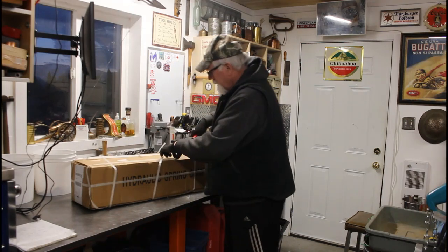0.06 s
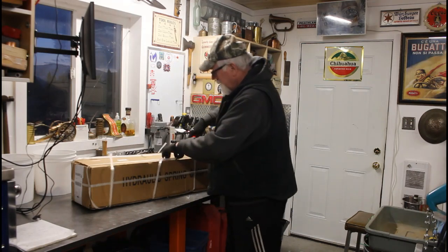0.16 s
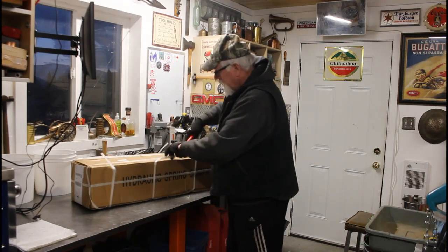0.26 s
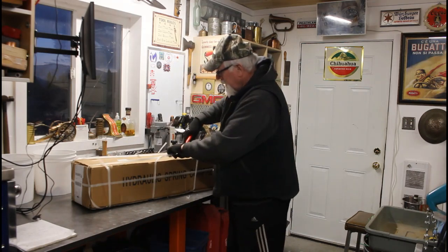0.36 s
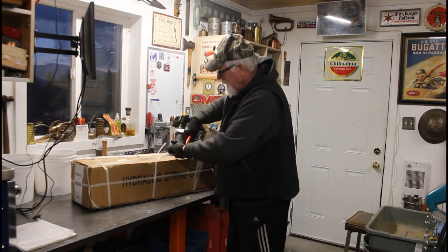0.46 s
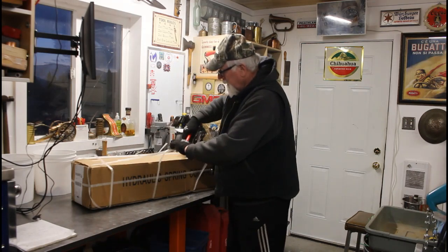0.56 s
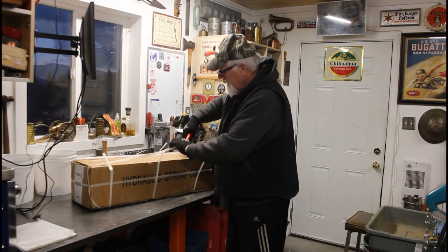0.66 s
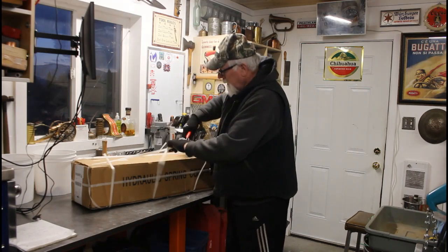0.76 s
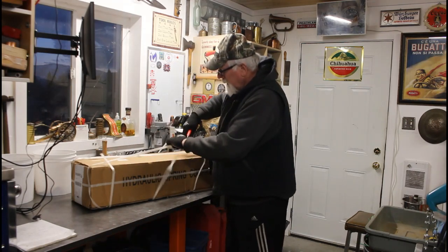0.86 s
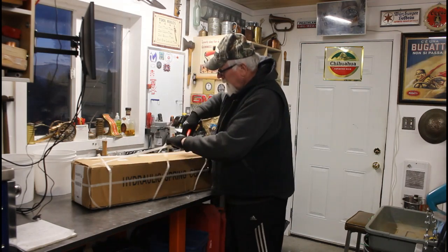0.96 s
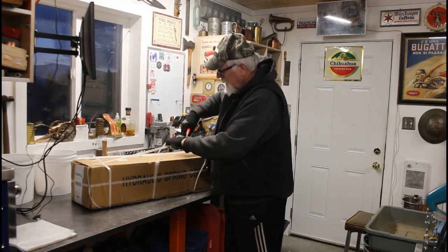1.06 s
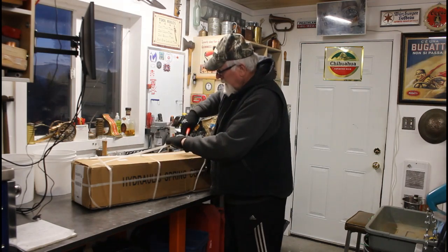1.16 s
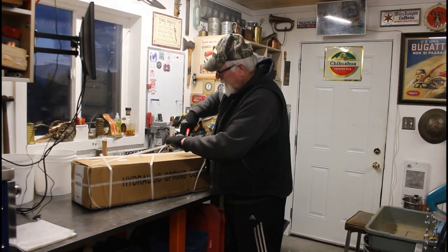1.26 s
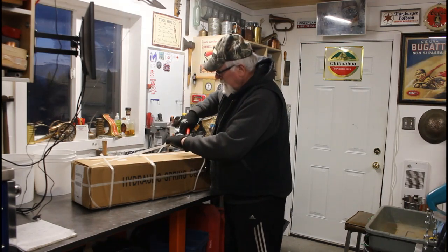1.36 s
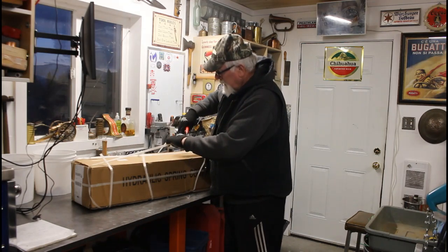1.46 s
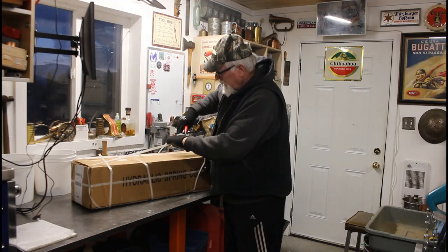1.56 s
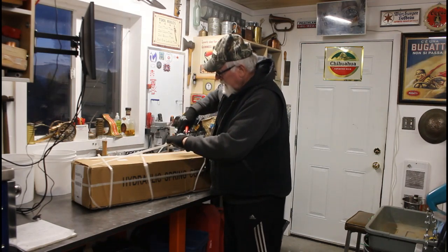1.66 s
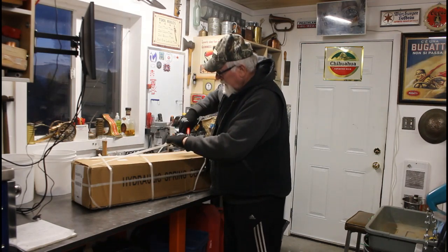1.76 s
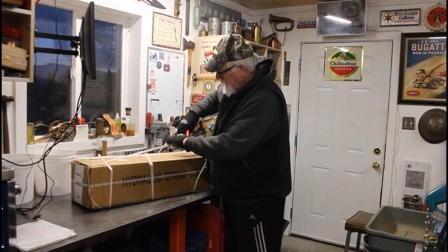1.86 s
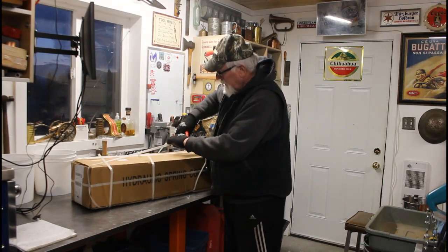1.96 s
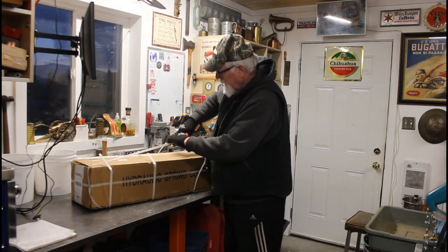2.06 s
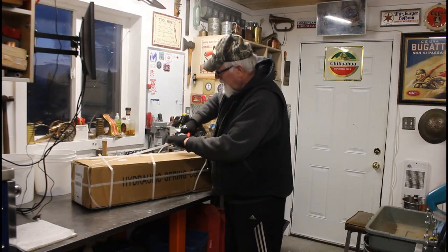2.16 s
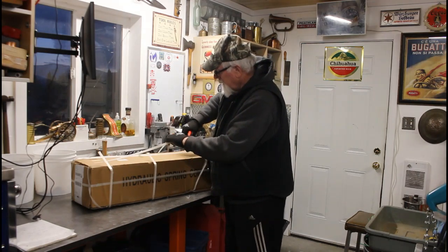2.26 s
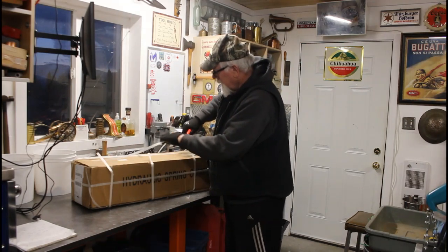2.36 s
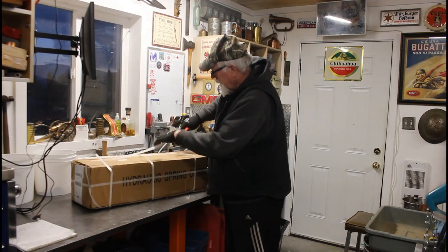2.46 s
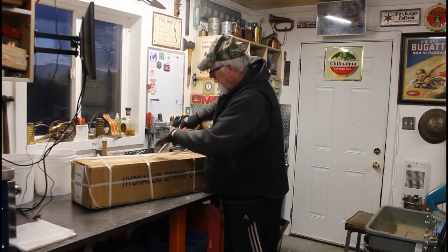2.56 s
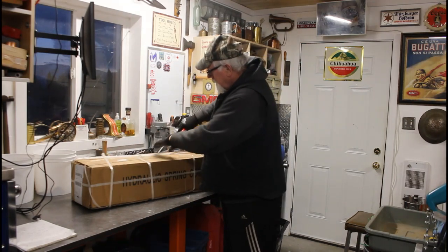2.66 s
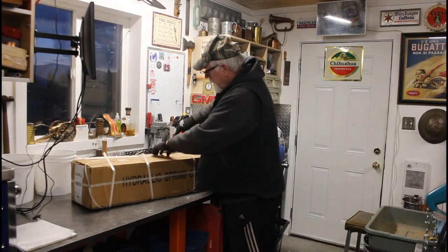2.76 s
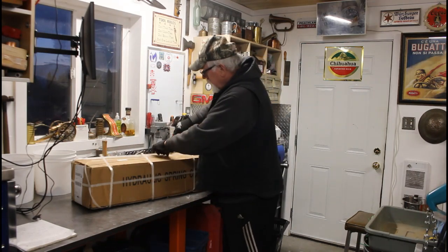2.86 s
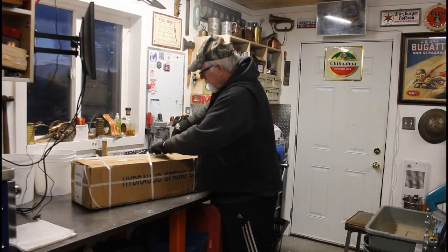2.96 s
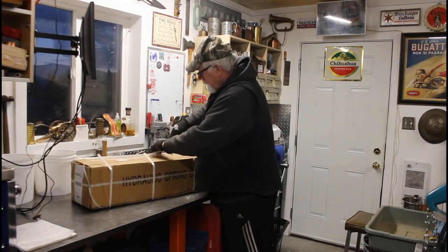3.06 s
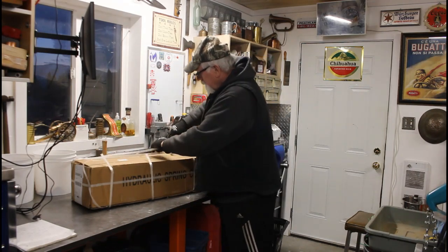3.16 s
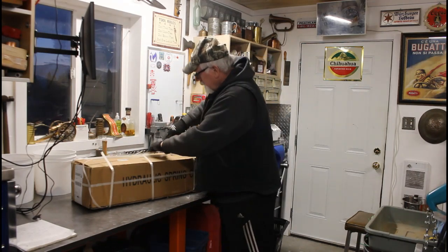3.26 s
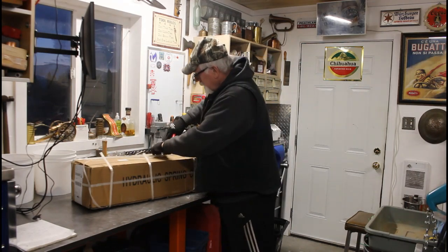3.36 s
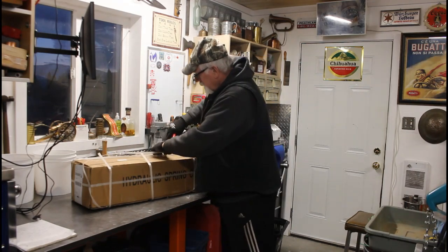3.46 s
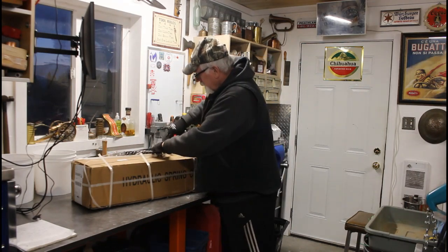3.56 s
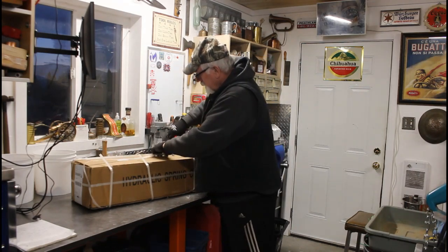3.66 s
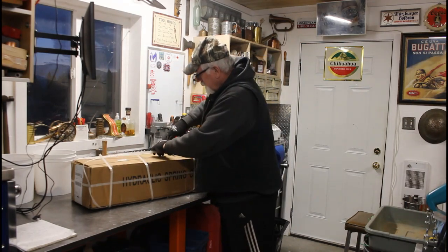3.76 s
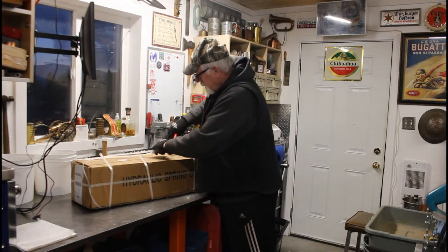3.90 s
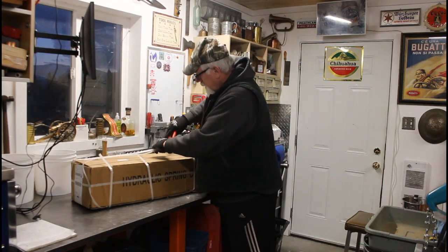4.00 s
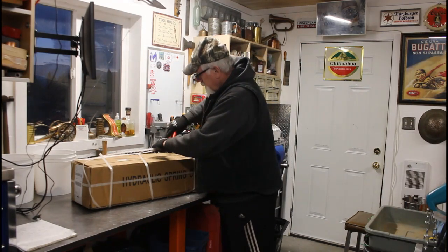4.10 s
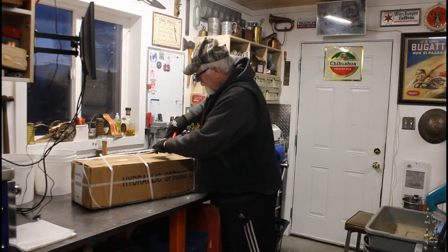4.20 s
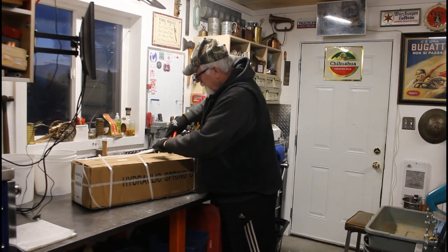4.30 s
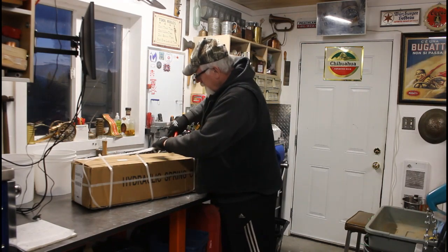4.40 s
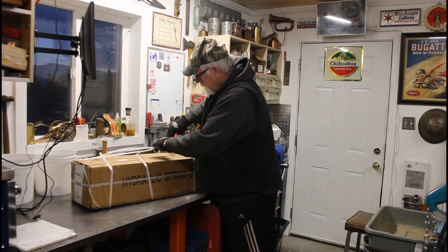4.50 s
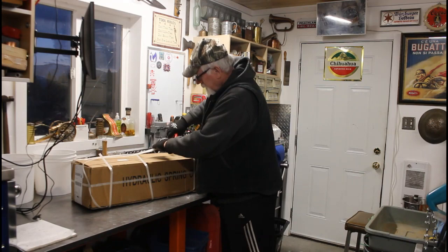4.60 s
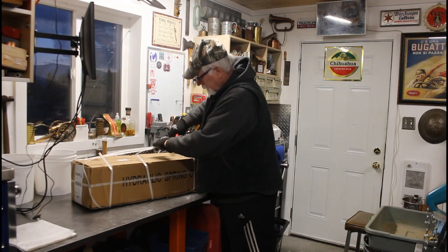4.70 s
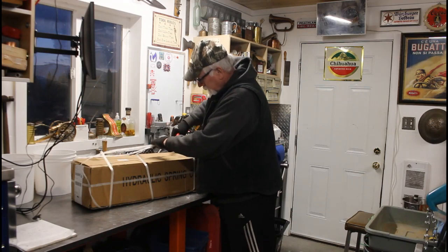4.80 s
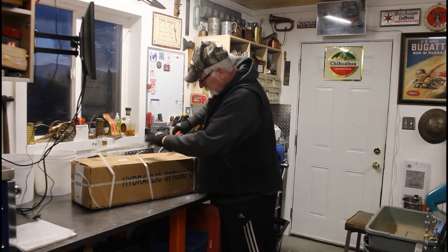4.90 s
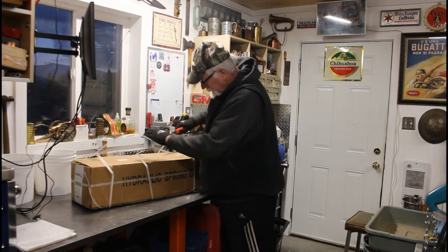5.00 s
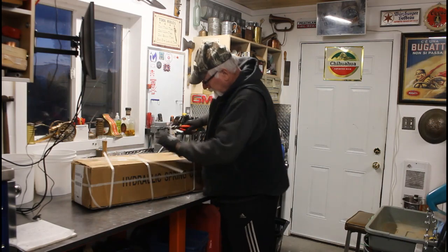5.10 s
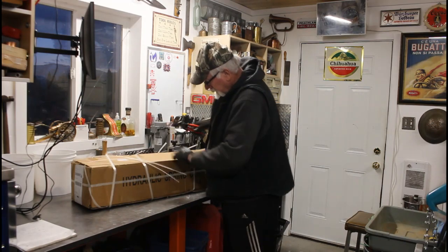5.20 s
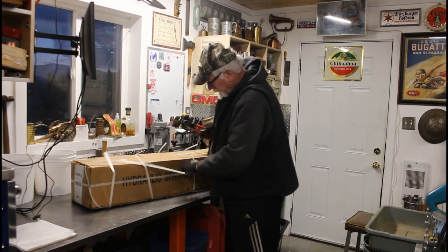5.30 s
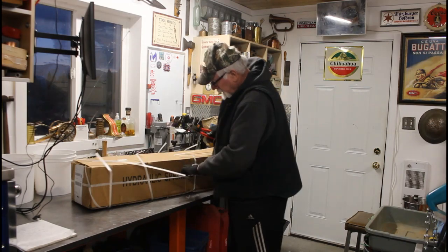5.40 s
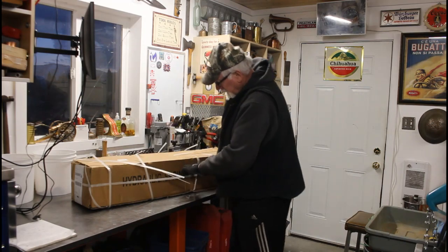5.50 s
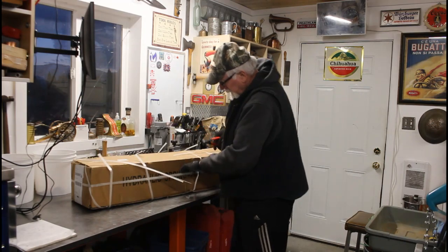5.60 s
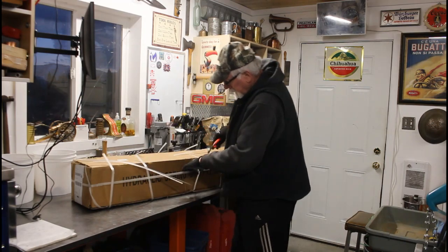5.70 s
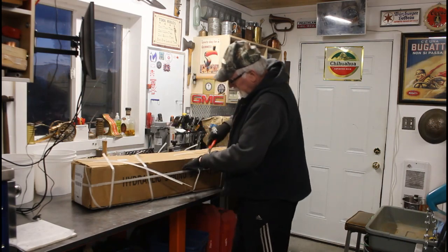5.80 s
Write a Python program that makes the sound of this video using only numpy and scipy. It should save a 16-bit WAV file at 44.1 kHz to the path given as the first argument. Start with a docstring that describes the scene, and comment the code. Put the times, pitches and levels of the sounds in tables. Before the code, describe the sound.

Scuffs, knocks and soft thuds on a hollow cardboard box, a tiny squeak, then two bright strap snaps, each followed by a slap on card.

```python
"""A carton is scraped, bumped and scuffed close by in a small, hard workshop; hand snips squeak once on a strap.
Then two taut plastic straps part in loud bursts of cracks, and their loose ends slap the card.
Cracks and slaps are decaying noise coloured by strap, snips or card; knocks and thuds ring the box panels.
Scrapes, swishes and creaks are tiny random slips; whines are narrow noise and the squeak is a gliding tone.
The room answers with dense reflections over quiet air and a faint low hum."""
import sys
import numpy as np
from scipy import signal
from scipy.fft import rfft, irfft, next_fast_len
from scipy.io import wavfile
from scipy.ndimage import uniform_filter1d

SR = 44100
rng = np.random.default_rng(int(sys.argv[2]) if len(sys.argv) > 2 else 0)


def unload_audio(sound):
    """Save the sound as a 16-bit wav file, at the path given as the first command line argument."""
    columns = np.transpose(np.atleast_2d(sound))
    # keep every value between -1 and 1, then stretch to whole-number steps
    steps = np.round(np.clip(columns, -1, 1) * 32767)
    wavfile.write(sys.argv[1], SR, steps.astype(np.int16))


N = 257716  # samples

# ringing of strap and snips: centre_hz, width_hz, level_db (relative)
SNIP_MODES = [(432, 13, 9.5), (1013, 320, 3), (2554, 330, 5), (3770, 170, 1.5), (4500, 430, 0),
              (4880, 330, 2), (6160, 600, -2.5), (7740, 260, -1), (8750, 300, -3), (13500, 390, -1)]
# carton panel resonances: centre_hz, width_hz, level_db (relative)
PANEL_MODES = [(90, 23, 4.5), (143.5, 28, 2.5), (214, 32, -5.5), (283, 39, -0.5), (363, 150, -8.5),
               (459, 62, -3), (557, 31, -5), (650, 53, -7.5), (1100, 150, -4)]


def amp(db):
    """Amplitude ratio of a level in dB."""
    return 10 ** (np.asarray(db) / 20)


def unit(x):
    """x scaled to rms 1."""
    return x / np.sqrt(np.mean(x ** 2) + 1e-20)


def along(points, hz):
    """Values between (hz, value) points, joined by straight lines on a log frequency axis."""
    f, v = np.transpose(points)
    return np.interp(np.log(hz + 1), np.log(f + 1), v)


def filtered(x, response):
    """x times a response of frequency, without phase shift."""
    size = next_fast_len(len(x) + 8192)
    spectrum = rfft(x, size) * response(np.fft.rfftfreq(size, 1 / SR))
    return irfft(spectrum, size)[:len(x)]


def causal(x, response):
    """x through a minimum-phase filter of the given gain, which rings only after each blow."""
    size = 2 * next_fast_len(len(x) // 2 + 4096)
    gain = np.maximum(response(np.fft.rfftfreq(size, 1 / SR)), 1e-6)
    cepstrum = irfft(np.log(gain), size)
    # folding the cepstrum onto positive time makes the filter causal
    cepstrum[1:size // 2] *= 2
    cepstrum[size // 2 + 1:] = 0
    return irfft(rfft(x, size) * np.exp(rfft(cepstrum)), size)[:len(x)]


def humps(modes, hz):
    """Gain of resonances that stand on a broad base."""
    power = 0.25
    for centre_hz, width_hz, level_db in modes:
        power = power + amp(level_db) ** 2 / (1 + (2 * (hz - centre_hz) / width_hz) ** 2)
    return np.sqrt(power)


def noise(response, size=N):
    """Coloured noise of rms 1."""
    return unit(filtered(rng.standard_normal(size), response))


def grains(response, rate, spread_db):
    """Tiny slips of uneven size at random moments (rate per second), coloured, rms 1."""
    moments = rng.random(N) < rate / SR
    sizes = rng.standard_normal(N) * amp(spread_db * rng.standard_normal(N))
    return unit(filtered(moments * sizes, response))


def blow(start_s, level_db, rise_s, t60_s):
    """Envelope of one contact: a quick rise, then a steady decay."""
    t = np.arange(SR // 2) / SR
    shape = (1 - np.exp(-t / rise_s)) * amp(-60 * t / t60_s)
    return np.pad(amp(level_db) * shape / shape.max(), (round(start_s * SR), N))[:N]


def swell(start_s, level_db, rise_s, t60_s):
    """Envelope of a brushing contact: it eases in, then decays steadily."""
    t = np.arange(SR // 2) / SR
    rise = np.sin(np.pi / 2 * np.minimum(t / rise_s, 1)) ** 2
    decay = amp(-60 * np.maximum(t - rise_s, 0) / t60_s)
    return np.pad(amp(level_db) * rise * decay, (round(start_s * SR), N))[:N]


def stroke(start_s, length_s, level_db):
    """Envelope of one slide: it gets going, slows a little, and dies away when the push ends."""
    attack_s, sag_db_per_s, release_db_per_s = 0.013, 23.5, 107
    t = np.maximum(np.arange(N) / SR - start_s, 0)
    fall_db = sag_db_per_s * t + release_db_per_s * np.maximum(t - length_s, 0)
    return (1 - np.exp(-t / attack_s)) * amp(level_db - fall_db)


def reflections(early_db, early_t60, late_db):
    """Bench and near walls answer first; the whole room builds up and each band dies at its own rate."""
    # decay of the room: hz, t60_s
    room_decay = [(100, 0.34), (500, 0.55), (2500, 0.53), (5000, 0.66), (8000, 0.45), (10500, 0.29),
                  (14000, 0.22)]
    hz, frame_s, cells = signal.stft(rng.standard_normal(SR), SR, nperseg=256)
    late_cells = cells * amp(-60 * frame_s / along(room_decay, hz)[:, None])
    late = signal.istft(late_cells, SR, nperseg=256)[1][:SR]
    t = np.arange(SR) / SR
    late = late * (1 - np.exp(-t / 0.0053))
    early = rng.standard_normal(SR) * amp(-60 * t / early_t60) * (t > .003)
    early = signal.lfilter([.75, .25], 1, early)  # a slightly softened treble
    return amp(early_db) * early / np.linalg.norm(early) + amp(late_db) * late / np.linalg.norm(late)


def workshop(x, early_db, late_db, early_t60=0.12, count=3):
    """The sound is spread in turn over several sets of random reflections, for a dense, even room tail."""
    turn = np.arange(N) / SR / .012  # the sound crossfades to the next set of reflections every 12 ms
    out = x
    for k in range(count):
        share = np.sqrt(np.clip(1 - np.abs((turn + k) % count - 1), 0, 1))
        out = out + signal.fftconvolve(x * share, reflections(early_db, early_t60, late_db))[:N]
    return out


def room_tone():
    """Quiet air with a faint low hum, both made of filtered noise."""
    # still workshop air: hz, gain_db
    air_colour = [(15, -52), (25, -21), (64, -11.5), (157, -6), (185, -11), (515, -13), (1100, -15),
                  (1360, -14.5), (1790, -18), (2280, -18.5), (4020, -19.5), (11800, -32), (15900, -42.5)]
    air = noise(lambda hz: amp(along(air_colour, hz)))
    hum = noise(lambda hz: 1 / (1 + ((hz - 62) / 4) ** 2))
    return amp(-55) * air + amp(-67.5) * hum


def rubbing():
    """Straps and sleeves slide over the card: fine scratching over a dull drag that rings the panels."""
    # slides over the card: start_s, length_s, drag_db, scrape_db (levels before the gains below)
    slide_rows = [(-0.05, 0.45, -36.5, -32), (0.512, 0.12, -34, -35), (0.83, 0.072, -49.5, -42),
                  (1.95, 0.19, -50.5, -47), (2.371, .15, -34, -32.5), (2.843, 0.24, -36.5, -37),
                  (3.309, 0.12, -39.5, -39), (3.691, 0.14, -37.5, -37), (4.845, 0.49, -34.5, -32),
                  (5.427, 0.46, -42.5, -42.5)]
    # dull drag: hz, gain_db
    drag_colour = [(60, -18), (130, -6), (380, -0.5), (700, -8.5), (1400, -20), (3000, -62)]
    # fine scratching: hz, gain_db
    scrape_colour = [(410, -14.5), (700, 4), (874, -2), (1180, -1), (1460, -3), (1920, -2.5), (5170, -7.5),
                     (11200, -15.5), (15900, -27)]
    # the hands never rest entirely
    drag_level, scrape_level = amp(-57.5), amp(-55)
    for start_s, length_s, drag_db, scrape_db in slide_rows:
        drag_level = drag_level + stroke(start_s, length_s, drag_db)
        scrape_level = scrape_level + stroke(start_s, length_s, scrape_db)
    # the speed of a hand wavers
    uneven = amp(1.5 * noise(lambda hz: hz < 5.7))
    drag = grains(lambda hz: amp(along(drag_colour, hz)) * humps(PANEL_MODES, hz), rate=500, spread_db=2.5)
    scrape = grains(lambda hz: amp(along(scrape_colour, hz)), rate=4000, spread_db=4.0)
    return uneven * (amp(-5.5) * drag_level * drag + amp(-9.5) * scrape_level * scrape)


def swishes():
    """Embossed plastic brushes plastic: a brief, thin hiss of tiny slips."""
    # a strap edge runs along another strap: start_s, level_db
    swish_rows = [(0.148, -38), (0.608, -49), (2.89, -41), (3.355, -45), (3.762, -54), (3.808, -42),
                  (5.04, -43), (5.275, -54), (5.412, -47)]
    centre_hz, width_hz = 10500, 3500
    speed = sum(swell(start_s, level_db, rise_s=.018, t60_s=.06) for start_s, level_db in swish_rows)
    return speed * grains(lambda hz: 1 / (1 + ((hz - centre_hz) / width_hz) ** 4), rate=8000, spread_db=3)


def whines():
    """Thin, hoarse whines where strap or blade binds: narrow bands of noise."""
    # whines of binding plastic: start_s, level_db, pitch_hz, width_hz, rise_s, t60_s
    whine_rows = [(0.088, -40.5, 2530, 150, 0.011, 0.23), (3.395, -40, 5070, 200, .008, 0.11),
                  (4.58, -67, 3410, 26, 0.065, 1), (4.602, -62, 5400, 70, 0.0091, 0.14)]
    out = np.zeros(N)
    for start_s, level_db, pitch_hz, width_hz, rise_s, t60_s in whine_rows:
        whine = noise(lambda hz: 1 / (1 + ((hz - pitch_hz) / width_hz) ** 2), size=SR // 2)
        out += blow(start_s, level_db, rise_s, t60_s) * np.resize(whine, N)
    return out


def carton(push, slide, split_hz=1900):
    """A contact sounds the hollow carton below the split and rasps on its skin above it."""
    # cardboard: hz, gain_db
    card_colour = [(71, -48), (120, -6), (362, -0.5), (545, -8), (928, -12), (1050, -11), (1370, -14),
                   (1790, -12.5), (4480, -16.5), (4960, -15), (6220, -21), (9550, -25.5), (15900, -42)]
    low = lambda hz: 1 / np.sqrt(1 + (hz / split_hz) ** 4)
    bass_cut = lambda hz: 1 / np.sqrt(1 + (450 / (hz + 1)) ** 4)
    hollow = noise(lambda hz: amp(along(card_colour, hz)) * humps(PANEL_MODES, hz) * low(hz) * bass_cut(hz))
    rasp = grains(lambda hz: amp(along(card_colour, hz)) * np.sqrt(1 - low(hz) ** 2), rate=9000, spread_db=0)
    # the card catches and lets go unevenly
    catch = unit(amp(3.8 * noise(lambda hz: hz < 120)))
    return push * hollow + slide * rasp * catch


def touches():
    """Knocks start almost at once; scuffs swell as the glove or strap gains speed."""
    # snips and gloves knock the box: start_s, hollow_db, rasp_db (levels before the gains below)
    knock_rows = [(0.519, -30.5, -31.5), (0.826, -36, -34.5), (1.115, -39, -44), (1.842, -41.5, -40),
                  (1.966, -31, -28.5), (2.83, -34, -34), (3.004, -27.5, -30), (3.079, -26.5, -38),
                  (3.36, -21.5, -30.5), (3.398, -31, -33.5), (4.325, -38, -41), (4.495, -41.5, -49),
                  (5.249, -26.5, -28.5)]
    # gloves and straps scuff the card: start_s, hollow_db, rasp_db (levels before the gains below)
    scuff_rows = [(0.084, -33, -34.5), (0.146, -22.5, -29), (0.342, -68, -39.5), (0.46, -38.5, -47),
                  (0.536, -34.5, -50), (0.874, -64, -41.5), (2.846, -52, -35.5), (3.626, -38.5, -42.5),
                  (3.706, -29, -43.5), (3.743, -44, -40.5), (5.037, -32.5, -40), (5.349, -35.5, -37.5),
                  (5.438, -33, -35.5), (5.62, -39.5, -41), (5.785, -37, -67)]
    push, slide = np.zeros(N), np.zeros(N)
    for envelope, rise_s, rows in [(blow, 0.001, knock_rows), (swell, 0.024, scuff_rows)]:
        for start_s, hollow_db, rasp_db in rows:
            push += envelope(start_s, hollow_db, rise_s, t60_s=0.13)
            slide += envelope(start_s, rasp_db, rise_s, t60_s=0.13)
    return carton(amp(-3) * push, amp(-2.5) * slide)


def thuds(sharpness=2.46):
    """Soft blows ring the panel modes near their own pitch; after each the box rocks back, softer and deeper."""
    # the box shifts and thuds on the bench: start_s, level_db (before the final gain), centre_hz
    thud_rows = [(0.0, -36, 183), (0.078, -22, 132), (0.41, -35.5, 377), (0.56, -31, 362),
                 (1.117, -34, 450), (1.97, -39, 175), (2.695, -32, 273), (2.836, -27.5, 115),
                 (2.944, -32, 118), (3.009, -34.5, 160), (3.358, -28.5, 336), (3.47, -43.5, 75),
                 (3.712, -22.5, 276), (3.764, -29.5, 255), (5.364, -20.5, 383), (5.381, -26.5, 170),
                 (5.445, -40, 159), (5.625, -33.5, 337), (5.767, -32.5, 343), (5.787, -24.5, 370)]
    rock_s, rock_db, rock_pitch = 0.0413, -11.5, 0.78  # delay, level and pitch ratio against the first blow
    rise_cycles = 1.07  # deeper thuds swell more slowly
    ref_t60_s, ref_hz, damping = 0.15, 200, 0.32  # higher thuds die sooner, by this exponent
    rocks = [(start_s + rock_s, db + rock_db, centre_hz * rock_pitch) for start_s, db, centre_hz in thud_rows]
    out = np.zeros(N)
    for start_s, level_db, centre_hz in thud_rows + rocks:
        band = lambda hz: 1 / (1 + (sharpness * np.log((hz + 1) / centre_hz)) ** 4)
        ring = noise(lambda hz: band(hz) * humps(PANEL_MODES, hz), size=SR // 2)
        # the strength of a blow stays even while its modes beat
        ring = ring / np.sqrt(np.abs(uniform_filter1d(ring ** 2, size=1100)) + 0.017)
        t60_s = ref_t60_s * (ref_hz / centre_hz) ** damping
        out += blow(start_s, level_db, rise_cycles / centre_hz, t60_s) * np.resize(ring, N)
    return amp(-2.5) * out


def straining():
    """Strap fibres creak under the closing jaws and faintly ring the snips."""
    # the jaws strain a strap: start_s, level_db (before the final gain)
    strain_rows = [(2.261, -33.5), (2.307, -28.5), (4.416, -52), (4.76, -38.5), (4.808, -36)]
    force = sum(blow(start_s, level_db, rise_s=0.0083, t60_s=0.086) for start_s, level_db in strain_rows)
    # creaking fibres: hz, gain_db
    colour = [(800, -17), (2000, -5.5), (5000, -7.5), (9000, -5.5), (13000, -4.5), (16000, -15)]
    creak = grains(lambda hz: amp(along(colour, hz)) * humps(SNIP_MODES, hz), rate=4400, spread_db=4.0)
    return amp(-5.5) * force * creak


def squeak(start=1.928, stop=1.971, first_hz=5410, mid_hz=5240, last_hz=4850):
    """The blades slip on the plastic: a thin whistle that swells, roughens and sags as they bite."""
    t = np.arange(N) / SR
    swell_s = [start, start + .005, start + .019, start + .023, stop - .002, stop]
    loudness = np.interp(t, swell_s, [0, .33, .33, 1, .9, 0])
    # the pitch falls throughout, faster towards the end; mid_hz lies partway down
    glide_s = [start, stop - .017, stop - .005, stop]
    pitch_hz = np.interp(t, glide_s, [first_hz, mid_hz, mid_hz - 130, last_hz])
    # the louder the whistle, the more its pitch trembles
    tremble = 1 + .012 * loudness * noise(lambda hz: hz < 600)
    phase = 2 * np.pi * np.cumsum(pitch_hz * tremble) / SR
    overtones = amp(-6) * np.sin(2 * phase) + amp(-32) * loudness * np.sin(3 * phase)
    return amp(-17.5) * loudness * (np.sin(phase) + loudness * overtones)


def crack(start_s, level_db, t60_s, pitch_hz, colour, room, stress_db=6, spread=0.14):
    """A decaying noise burst that favours one pitch, followed by its own reflections."""
    burst = amp(level_db - 60 * np.arange(SR) / SR / t60_s) * rng.standard_normal(SR)
    stress = lambda hz: amp(stress_db / (1 + (np.log((hz + 1) / pitch_hz) / spread) ** 2))
    heard = causal(burst + np.linalg.norm(burst) * room, lambda hz: colour(hz) * stress(hz))
    return np.pad(heard, (round(start_s * SR), N))[:N]


def slaps():
    """A freed strap whips against the card; a flatter landing is duller."""
    # loose ends slap the carton: start_s, level_db (before the final gain), t60_s, pitch_hz, brightness_hz
    slap_rows = [(2.6894, -7, 0.0079, 1880, 5450), (2.692, -5, 0.014, 684, 4080),
                 (2.696, -16.5, 0.059, 1790, 2200), (5.1530, -13.5, 0.027, 2300, 8150),
                 (5.161, -16, 0.041, 1280, 6000)]
    # slapped card: hz, gain_db
    slap_colour = [(71, -30), (120, -51), (341, -8), (418, -13), (568, -6), (655, -5.5), (726, -8.5),
                   (1370, -11), (1790, -8), (4670, -10), (7170, -17), (8620, -11.5), (15900, -24.5)]
    out = np.zeros(N)
    for start_s, level_db, t60_s, pitch_hz, bright_hz in slap_rows:
        colour = lambda hz: amp(along(slap_colour, hz)) / np.sqrt(1 + (hz / bright_hz) ** 2)
        room = reflections(early_db=-1.0, early_t60=0.12, late_db=-3.5)
        out += crack(start_s, level_db, t60_s, pitch_hz, colour, room)
    return amp(10.5) * out


def cuts():
    """The tension lets go in a few cracks, each at the pitch of the freed length, that ring strap and snips."""
    # a strap tears in quick steps: start_s, level_db (before the final gain), t60_s, strongest pitch_hz
    cut_rows = [(2.3254, -0.5, 0.013, 2850), (2.3263, -0.5, 0.012, 4870), (2.3286, 1, 0.022, 7760),
                (2.3343, -3.5, 0.02, 2580), (4.8321, 0, 0.016, 4270), (4.8346, 0.5, 0.022, 4500),
                (4.8365, -2, 0.034, 7900)]
    # parting strap: hz, gain_db
    strap_colour = [(100, -34), (250, -13.5), (450, -14.5), (800, -18), (1600, -13), (2600, -10.5),
                    (5000, -9.5), (8000, -7.5), (10000, -10), (13000, -16.5), (16000, -25)]
    colour = lambda hz: amp(along(strap_colour, hz)) * humps(SNIP_MODES, hz)
    out = np.zeros(N)
    for start_s, level_db, t60_s, pitch_hz in cut_rows:
        room = reflections(early_db=-10.5, early_t60=0.075, late_db=-4.5)
        out += crack(start_s, level_db, t60_s, pitch_hz, colour, room)
    return amp(5.5) * out


def scene():
    """Everything sounds in the one room; the squeak and the low thuds reach the microphone more directly."""
    contacts = touches() + rubbing() + swishes() + straining() + whines()
    handling = workshop(contacts, early_db=-4.0, late_db=-5.5, count=6)
    bumps = workshop(thuds(), early_db=-7, late_db=-9.0, count=2)
    whistle = workshop(squeak(), early_db=-5, late_db=-13.5, early_t60=0.32, count=3)
    return (cuts() + slaps() + handling + bumps + whistle + room_tone())[None]


def record(dry):
    """The loudest peaks flatten near full scale; a steep filter removes what lies above the band limit."""
    top_hz = 15900
    held = dry[0] / (1 + np.abs(dry[0] / 1.05) ** 6) ** (1 / 6)
    return filtered(held, lambda hz: 1 / np.sqrt(1 + (hz / top_hz) ** 320))[None]


dry = scene()
out = record(dry)
unload_audio(out)
```